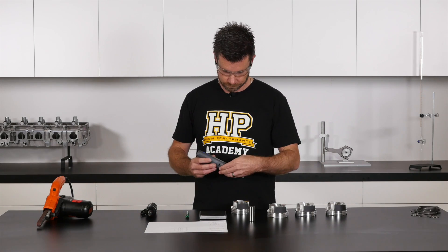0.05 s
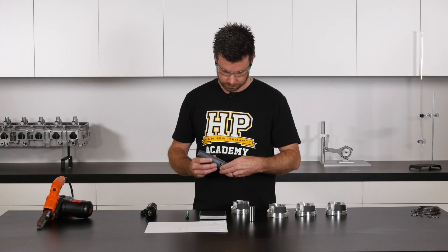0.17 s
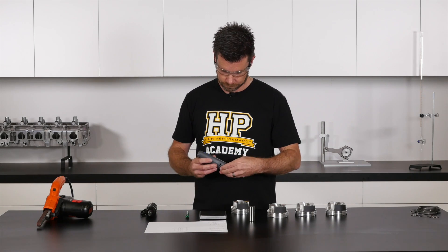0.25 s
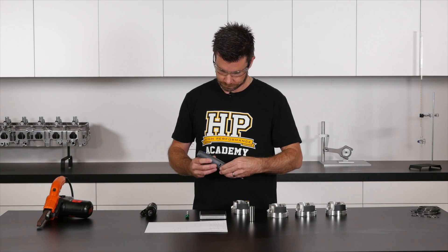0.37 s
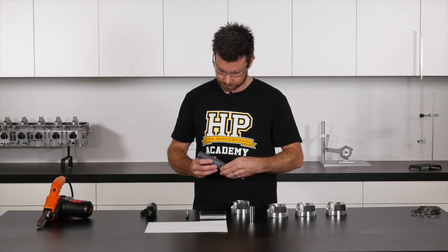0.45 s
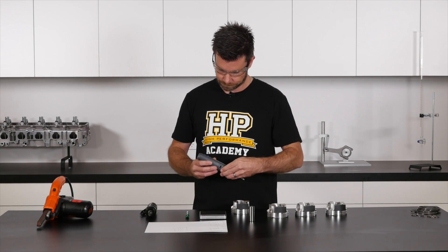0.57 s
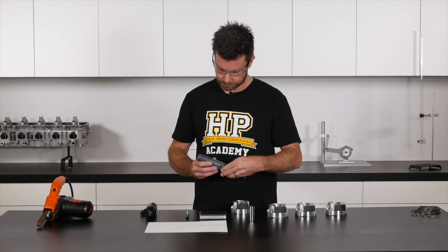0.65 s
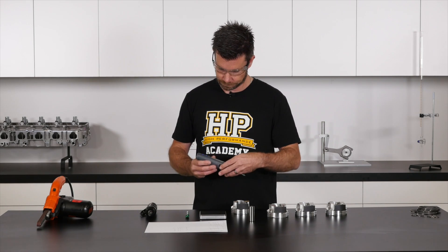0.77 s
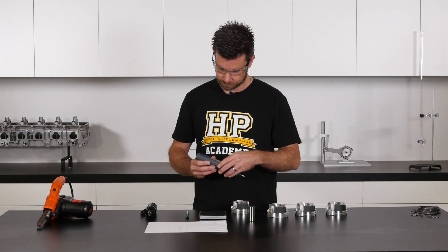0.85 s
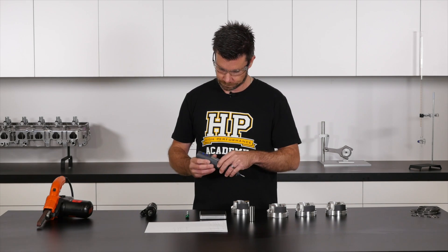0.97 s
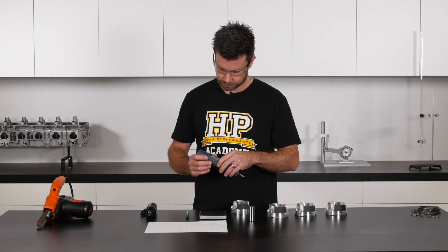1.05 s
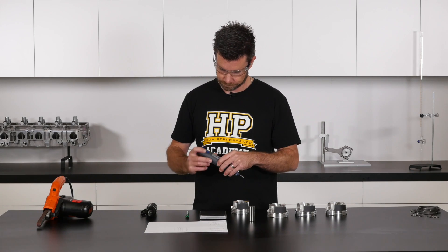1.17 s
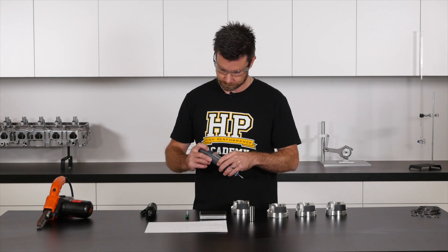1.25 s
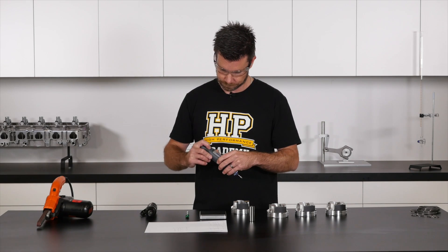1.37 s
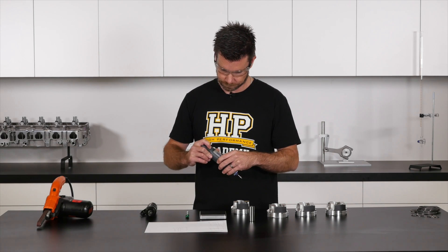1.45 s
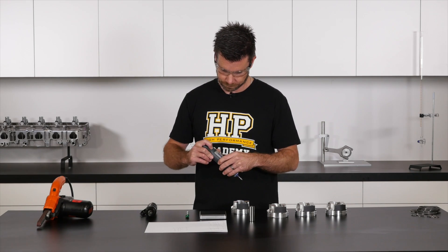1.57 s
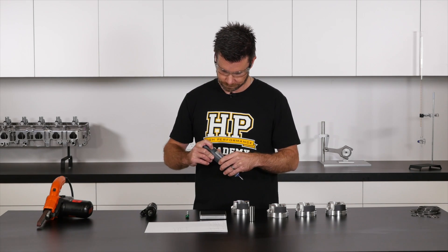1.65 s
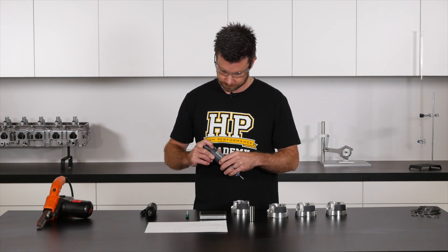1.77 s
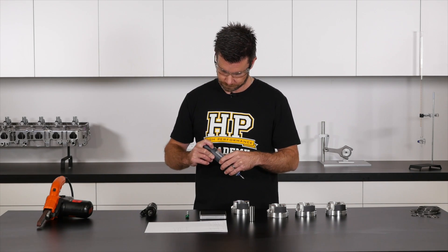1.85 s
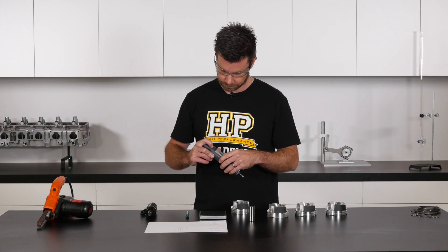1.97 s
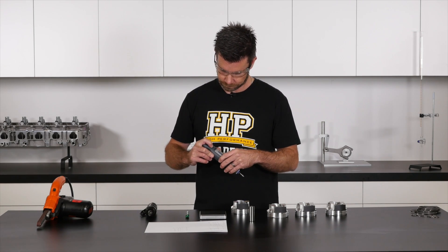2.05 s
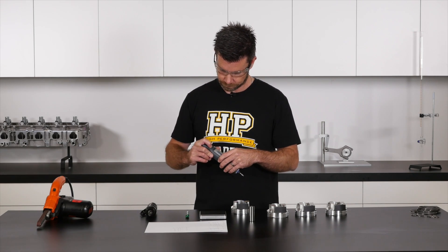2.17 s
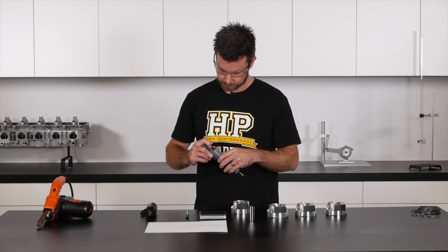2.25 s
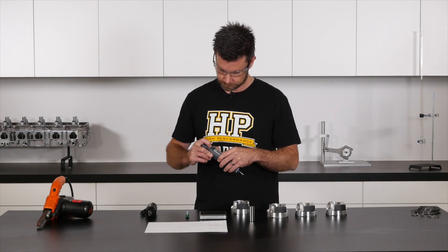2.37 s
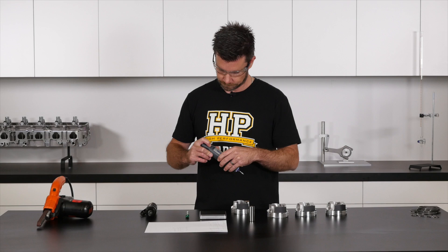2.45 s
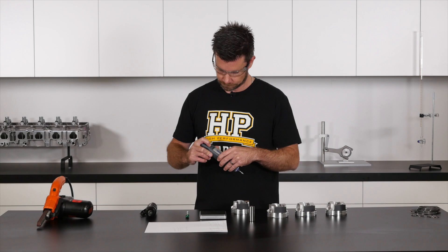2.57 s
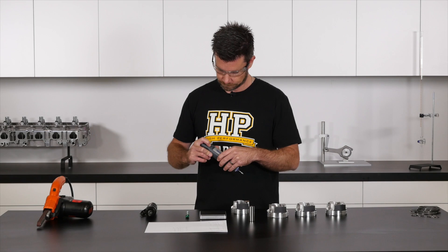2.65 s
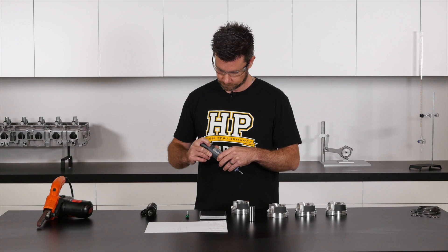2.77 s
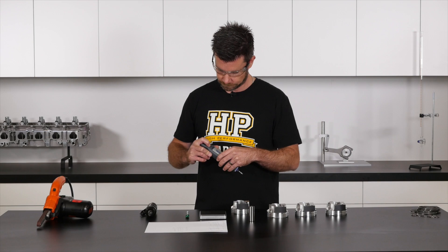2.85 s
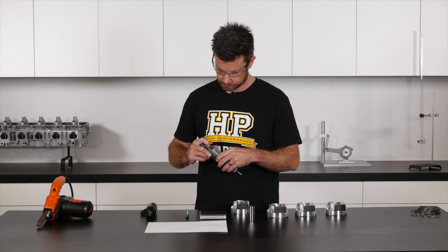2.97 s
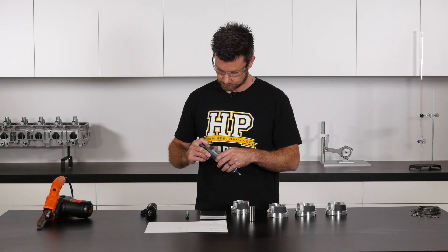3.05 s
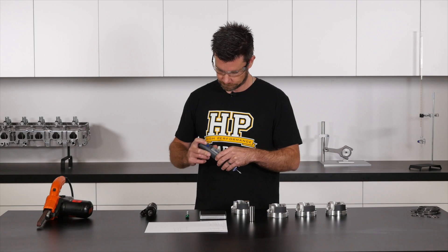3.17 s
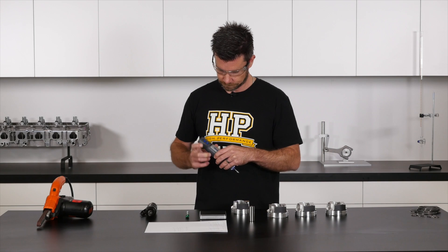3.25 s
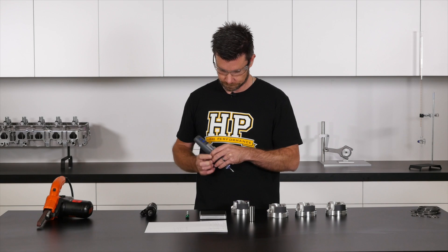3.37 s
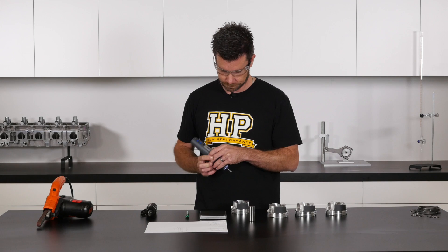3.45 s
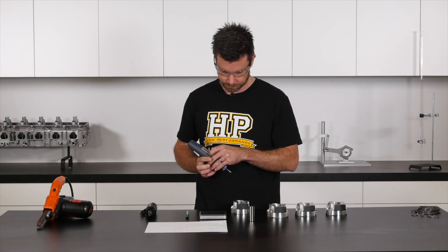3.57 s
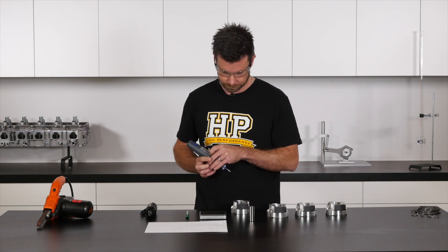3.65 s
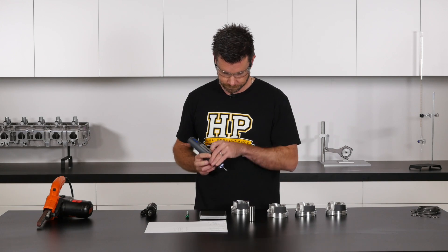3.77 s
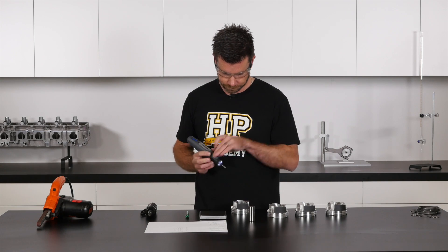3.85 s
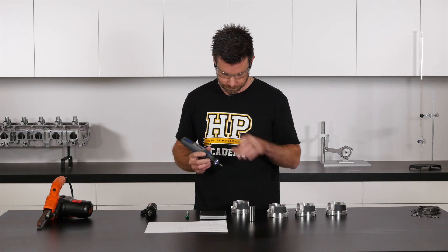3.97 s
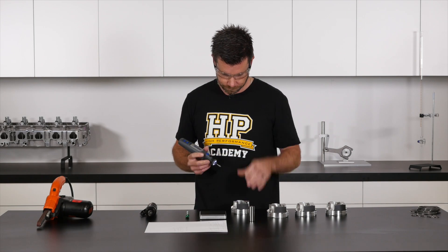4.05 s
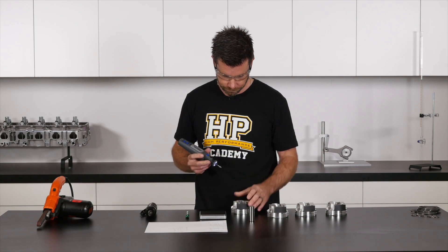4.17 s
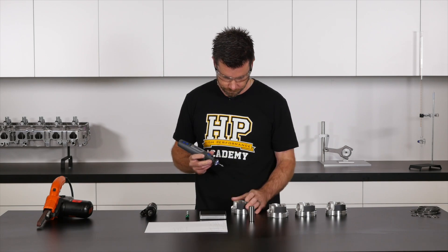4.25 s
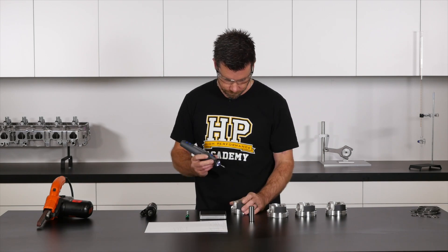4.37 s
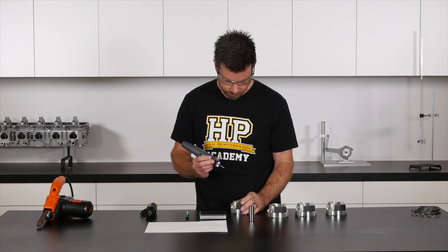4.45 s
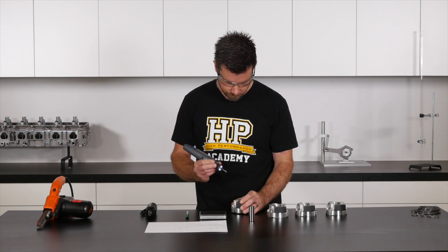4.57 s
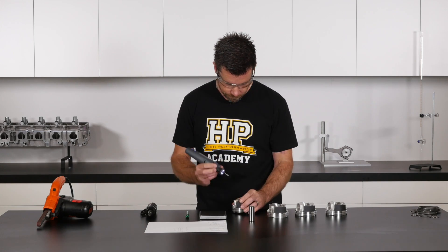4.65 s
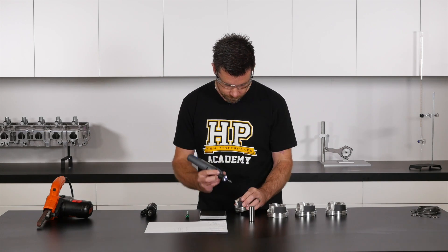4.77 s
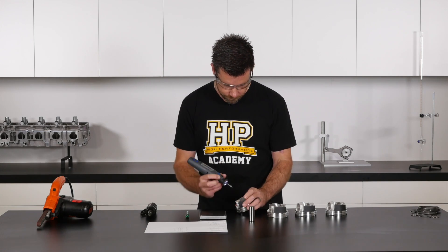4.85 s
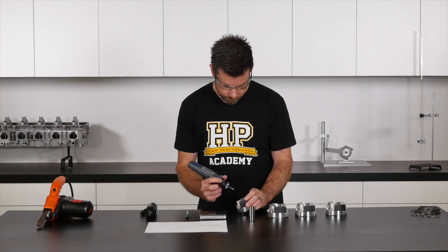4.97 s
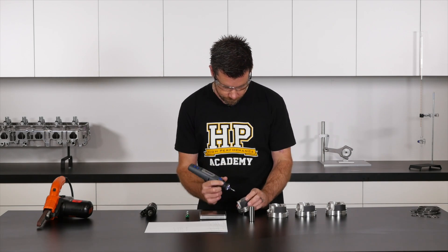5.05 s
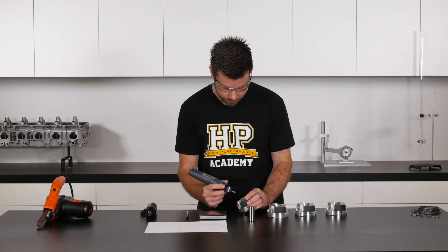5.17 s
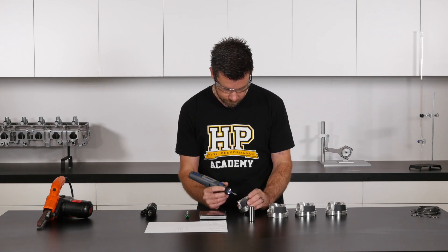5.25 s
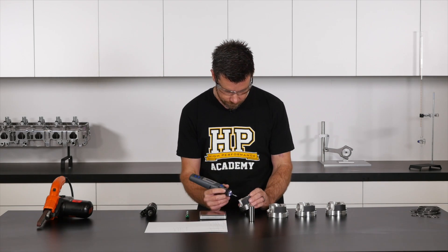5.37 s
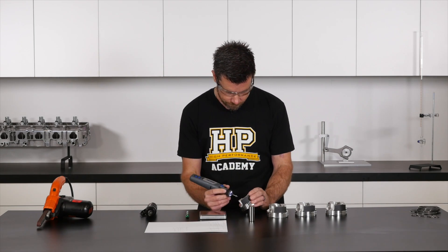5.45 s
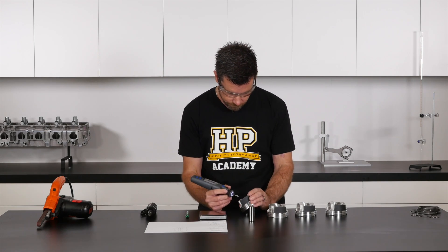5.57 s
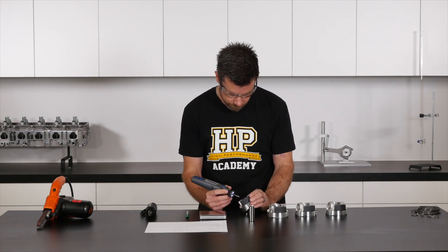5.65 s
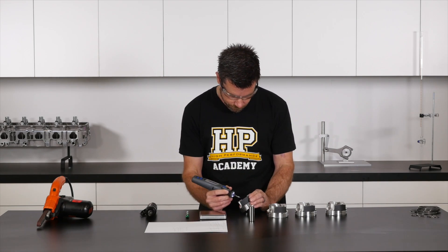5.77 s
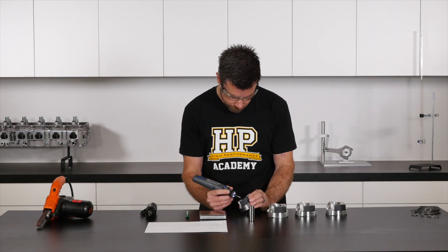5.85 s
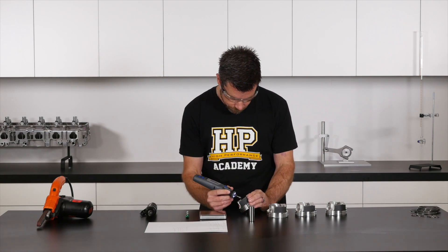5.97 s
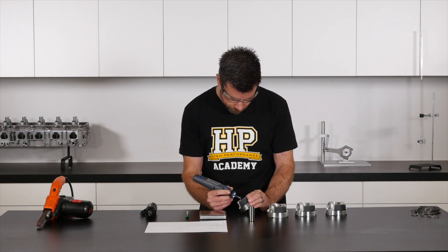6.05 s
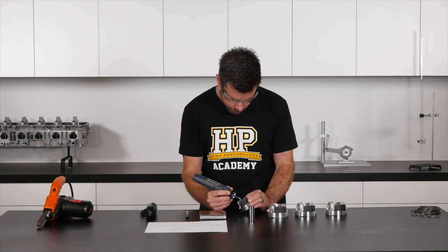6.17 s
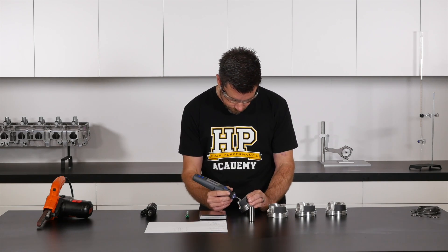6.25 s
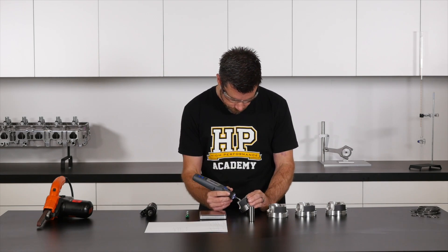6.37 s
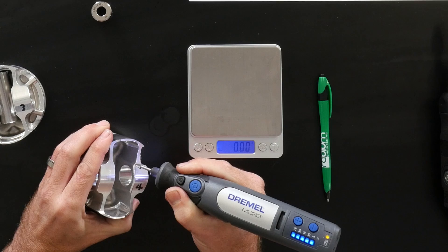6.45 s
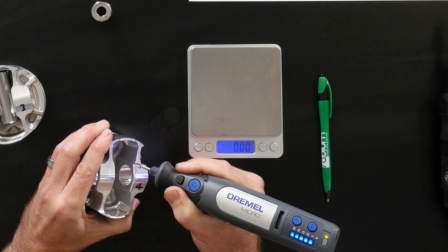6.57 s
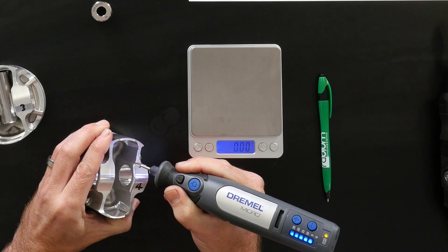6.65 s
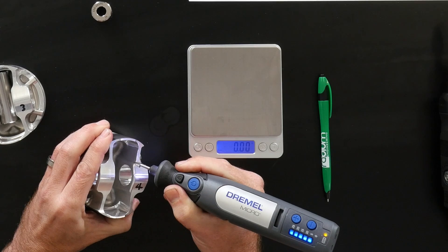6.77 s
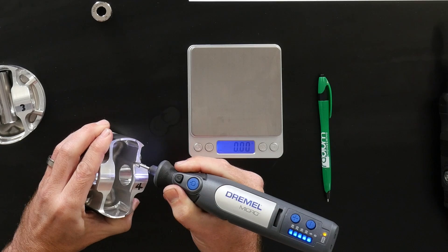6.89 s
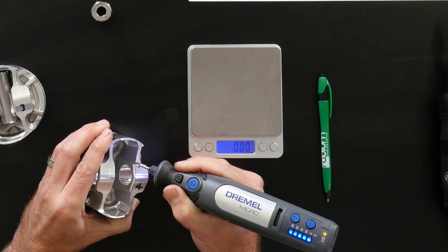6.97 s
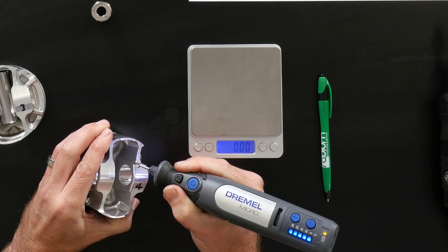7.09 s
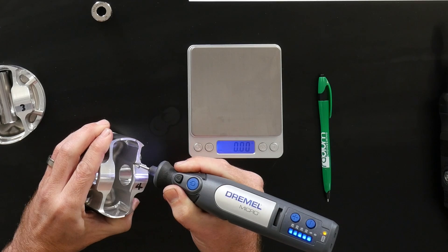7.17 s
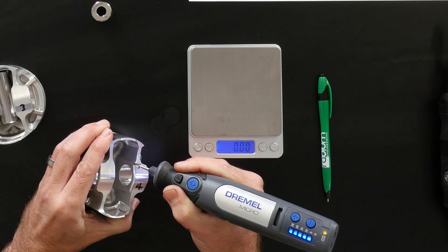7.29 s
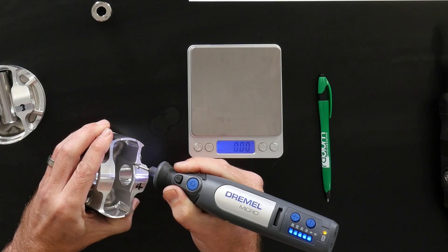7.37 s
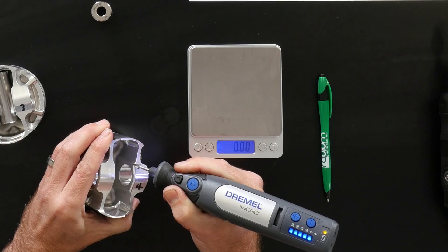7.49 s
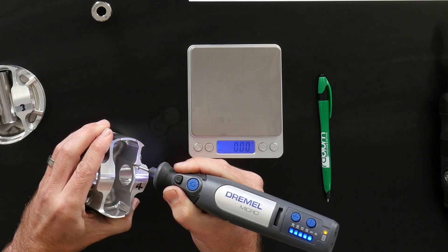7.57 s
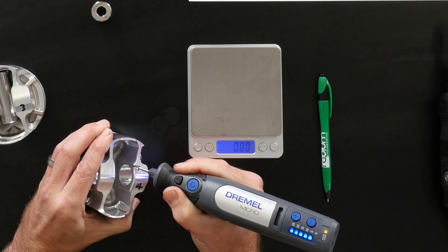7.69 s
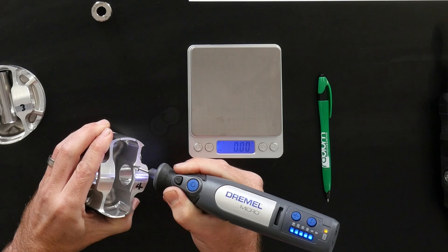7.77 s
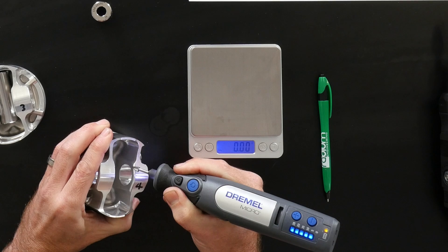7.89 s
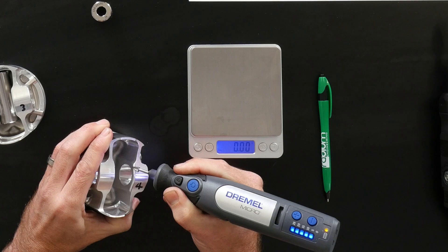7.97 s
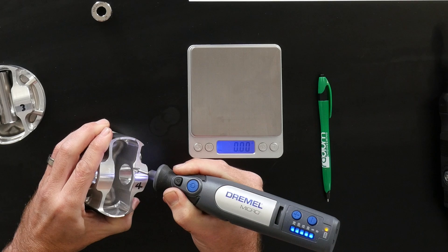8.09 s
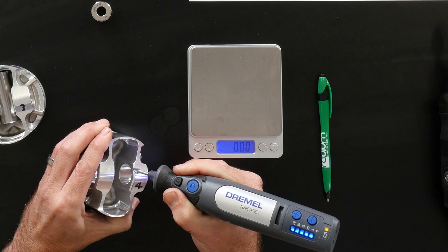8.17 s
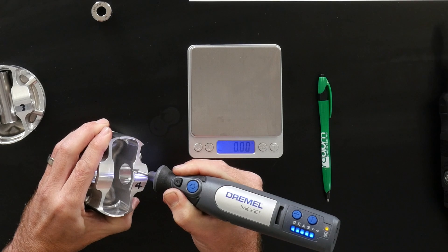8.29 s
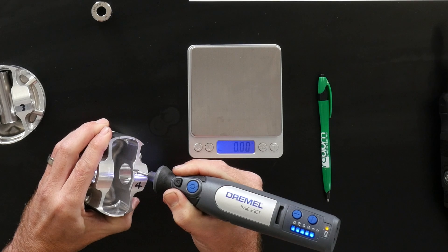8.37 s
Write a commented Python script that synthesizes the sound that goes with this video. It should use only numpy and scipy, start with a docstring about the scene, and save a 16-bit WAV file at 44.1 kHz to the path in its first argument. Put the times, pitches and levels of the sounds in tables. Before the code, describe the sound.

A small cordless rotary tool clicks on, its whine stepping up through three speeds, then the bit grinds metal with a rough chattering hiss.

```python
"""In a workshop, a small cordless rotary tool is switched on and stepped up through three speeds, close up and in mono.
Its whine is a stack of shaft orders, louder with speed and coloured by resonances; filtered noise is its fan's rush.
It is lowered to a metal piston, which knocks on the bench: short clicks ring the modes of the bench top.
Then the bit bites: the motor sags, grit noise swells once a turn and tones halfway between the orders chatter.
Ticks of plastic, the speed controller's thin switching tone and a faint room tone complete the scene."""
import sys
import numpy as np
from scipy import signal
from scipy.fft import rfft, irfft, next_fast_len
from scipy.io import wavfile

SR = 44100
rng = np.random.default_rng(int(sys.argv[2]) if len(sys.argv) > 2 else 0)


def generate_wav(sig):
    """Save sig (samples, or channels by samples) to the path in sys.argv[1] as 16-bit PCM at SR."""
    pcm = np.round(np.clip(np.atleast_2d(sig).T, -1, 1) * 32767).astype(np.int16)
    wavfile.write(sys.argv[1], SR, pcm)


N = 371322
TIME = np.arange(N) / SR   # s
STEPS = TIME[::100]        # s, the coarser clock of the slow controls
CUTOFF_HZ = 15720
LOW_SPLIT_HZ, HIGH_SPLIT_HZ = 3250, 9000   # borders of the low, middle and top register

# whine, buzz and sizzle, a row for each register, before grip and pull:
# (full-speed level [dB], loss per halving of speed [dB], level at full contact [dB])
TONES = [(-18.5, 11.5, -26), (-28, 5.5, -25), (-35, 7.5, -20.5)]
# noise of fan, brushes and grit, a row for each register, before grip and pull:
# (full-speed level [dB], loss per halving of speed [dB], level at full contact [dB])
NOISE = [(-29, 7.5, -31), (-39.5, 4.5, -32), (-41.5, 6.5, -25.5)]

# relative strengths of the low shaft orders; three commutator segments favour 3, 6 and 9:
# (multiple of shaft rate [-], level [dB])
START_ORDERS = [(1, -36), (3, -13), (4, -20), (6, -12), (7, -19), (8, -18), (9, -3), (10, -14), (12, -6),
                (14, -13), (15, 2), (16, -17), (18, -10), (19, -30), (50, -33)]
SLOW_ORDERS = [(1, -52), (2, -44), (3, -15), (4, -34), (5, -30), (6, 0), (7, -19), (8, -24), (9, -1),
               (10, -11), (11, -18), (12, -7), (13, -19), (14, -10), (15, -8), (16, -17), (18, -26)]
CLIMB_ORDERS = [(1, -25), (2, -13), (3, 2), (4, -5), (5, -10), (6, -1), (7, -9), (8, -8), (9, -7),
                (12, -15)]
SURGE_ORDERS = [(1, -15), (2, -12.5), (3, 3.5), (4, -8), (5, -1), (6, 5), (7, -9), (8, -15)]
RAISED_ORDERS = [(1, -12.5), (2, -9.5), (3, 6.5), (4, 1), (5, -0.5), (6, 5.5), (7, 1.5), (8, -3.5)]
LOWERED_ORDERS = [(1, -30), (2, -28.5), (3, -4.5), (4, -6.5), (5, -5.5), (6, -10), (7, -9), (8, -21)]
POISED_ORDERS = [(1, -15.5), (2, -3), (3, 3.5), (4, 1.5), (5, -6), (6, 3), (7, 1.5), (8, -6.5)]
TOUCHING_ORDERS = [(1, -13), (2, -3), (3, 3), (4, 3.5), (5, 4), (6, -1), (7, -3), (8, -6)]
CUTTING_ORDERS = [(1, -10), (2, 1), (3, 0.5), (4, -2), (5, 2), (6, -2), (7, -4.5), (8, -4.5)]
# treble resonances of housing and bit: (centre [Hz], width [Hz], height [dB])
SLOW_MODES = [(4870, 590, 15), (6070, 70, 20), (6530, 240, 24.5), (7640, 240, 22.5), (9200, 130, 17),
              (11000, 500, 7), (13260, 880, 11)]
RAISED_MODES = [(5740, 3300, 2.7), (10200, 363, 3.3), (11370, 240, 9.4)]
LOWERED_MODES = [(3970, 500, 27.8), (5350, 410, 24.7), (10260, 770, 12.5), (11350, 500, 8.94)]
APPROACH_MODES = [(3600, 2500, 9.9), (5050, 350, 15.4), (8500, 1100, 4.6), (10100, 640, 15.6),
                  (11960, 1600, 7.4)]
POISED_MODES = [(3430, 5400, 3), (5277, 195, 15), (6460, 500, 9), (11400, 500, 12.7), (13470, 250, 9)]
BITING_MODES = [(4750, 190, 14), (6100, 170, 5.9), (8400, 350, 12), (8880, 220, 11), (9900, 230, 6.9),
                (10800, 290, 16), (13550, 180, 11)]
CUTTING_MODES = [(3400, 89, 12.8), (4646, 123, 22.5), (6700, 390, 8), (8100, 710, 10.6), (9475, 120, 14),
                 (10700, 400, 23), (11750, 160, 21)]
# how the tool is running and held, blended in between:
# (start [s], end [s], bearing looseness [1 = usual], orders [table], resonances [table])
SITUATIONS = [(0, 1.15, 1.9, START_ORDERS, SLOW_MODES), (1.29, 2.839, 0.76, SLOW_ORDERS, SLOW_MODES),
              (3.09, 3.23, 1.338, CLIMB_ORDERS, SLOW_MODES),
              (3.274, 3.353, 1.9, SURGE_ORDERS, RAISED_MODES),
              (3.418, 3.99, 1.21, RAISED_ORDERS, RAISED_MODES),
              (4.502, 5.125, 1.07, LOWERED_ORDERS, LOWERED_MODES),
              (5.455, 5.92, 1.07, POISED_ORDERS, APPROACH_MODES),
              (6.05, 7.26, 0.44, POISED_ORDERS, POISED_MODES),
              (7.385, 7.46, 1.3, TOUCHING_ORDERS, POISED_MODES),
              (7.525, 7.73, 1, CUTTING_ORDERS, BITING_MODES),
              (7.797, 8.46, 0.76, CUTTING_ORDERS, CUTTING_MODES)]

# noise colours, relative: (frequency [Hz], density [dB per Hz])
BRUSHES = [(60, -33), (150, -22), (240, -18), (600, -7.5), (1050, 3.5), (1500, -7), (2500, -7.5),
           (3500, -22), (5100, -14.5), (6600, -12), (7600, -14), (8500, -15), (10200, -17), (12600, -10),
           (15500, -22)]
FAN = [(60, -62), (150, -39), (300, -24), (500, -14), (800, -10), (1080, 3.5), (1400, -4.5), (2100, -8),
       (2700, -21), (3400, -32.5), (6500, -29.5), (8500, -37), (12000, -39.5), (15700, -62)]
GRIT = [(40, -30), (90, -12.5), (170, -7), (600, -9), (1150, -8), (1500, -9), (2100, -1.5), (3500, -13.5),
        (4600, -9), (6500, -8), (8500, -7.5), (10900, 4), (13500, -7), (15700, 2)]
ROOM_TONE = [(15, -39), (25, -15), (59, -6), (69, -19), (82, -2), (101, -7.5), (113, -11), (126, -9.5),
             (227, -11.5), (260, -10), (349, -14), (1380, -22), (15500, -39)]
ROOM_TONE_DB = -62

# how firmly the bit touches the metal: (time [s], contact [share 0-1])
CONTACT = [(7.3, 0), (7.45, 0.05), (7.53, 0.38)]
# the bit bounces on every second turn: (time [s], level [dB])
CHATTER = [(7.68, -74), (7.76, -32), (7.86, -40), (7.94, -33), (8.03, -44), (8.1, -36), (8.2, -39),
           (8.3, -29.5), (8.42, -35.5)]
# tones of that chatter: (multiple of shaft rate [-], level [dB])
CHATTER_ORDERS = [(1.5, -11.5), (3.5, -9), (4.5, -7.5), (5.5, -3), (6.5, -4), (7.5, -9), (8.5, -14)]
# button and finger ticks on the plastic: (time [s], peak [dB], centre [Hz])
TICKS = [(.097, -44, 1500), (0.459, -45, 2000), (.541, -29.5, 2600), (.569, -52, 4500), (.586, -38, 3600),
         (.602, -50, 4000), (0.643, -44, 1100), (.688, -50, 1500), (.849, -40, 2500), (.874, -40, 2200)]
# the piston knocks on the bench: (time [s], level [dB])
KNOCKS = [(4.803, -39), (5.062, -27), (5.11, -28.5), (5.368, -35.5), (5.68, -10.5), (5.697, -17.5),
          (5.806, -16), (5.818, -13)]
# modes of the bench top: (frequency [Hz], level [dB], 60 dB decay [s])
BENCH = [(101, -42, 0.34), (149.7, -22, 0.43), (247, -18, 0.097), (318, -8.5, 0.056), (465, -7.5, 0.049),
         (555, 0, 0.036), (640, -9, 0.045), (790, -32, .05), (1050, -24, 0.034)]
# the speed controller's switching tone: (time [s], peak level [dB])
SWITCHING = [(.63, -100), (.645, -64), (.95, -62), (1.1, -45), (1.28, -42), (1.5, -47), (2.5, -47),
             (3.1, -68), (3.3, -100)]
SWITCHING_HZ = 10002

# the speed is stepped up: (start [s], setting [turns per s], ramp [s], rotor lag [s])
SPEED_STEPS = [(.645, 170, .49, .11), (2.486, 251.8, .283, .11), (2.964, 385, .334, .042)]
# friction and load hold the motor under its setting: (time [s], offset [turns per s])
SAG = [(1.5, -7.5), (1.9, -4.3), (2.5, -1.5), (3.4, -4.2), (4.62, -3.6), (4.86, -5.8), (5.35, -3.3),
       (5.88, -2.8), (6.36, -5), (6.6, -4), (7.36, -4.3), (7.68, -9.7), (7.84, -5.4)]
FULL_SPEED, IDLE_SPEED = 381, 161   # turns per s
TONE_IDLE_DB, NOISE_IDLE_DB = 3.5, 5.5   # further loss per halving of speed below IDLE_SPEED

# register levels as the hands shift the tool: (time [s], low [dB], middle [dB], top [dB])
GRIP = [(1.2, -3, -2.5, -2), (1.7, -1, -0.5, 0), (2.45, 0.5, -0.5, -0.5), (2.66, -1.5, 1.5, 1),
        (3.05, -4, -4.5, 0.5), (3.29, 5, -2, -4), (3.42, 1.5, 6, -5), (3.54, 0.5, 2.5, -5),
        (3.8, 1.5, 0.5, -3), (4.25, -1, -3, -2.5), (4.48, 1.5, 2.5, 1.5), (4.65, 0, 0.5, 0),
        (5.15, -1, 2, 1), (5.38, -1, -2.5, 3.5), (5.7, -2, -4, 4.5), (6.12, 0, 0, -0.5), (7.4, 0.5, .5, 2)]
# groups of three below are low, middle and top register
NOISE_FOLLOWS = (0.3, 0.66, 0.87)   # the noise's share of the swing of grip and throb
# a slow throb sets in while the bit hovers over the metal
THROB_FROM_S, THROB_PERIOD_S, THROB_DB = 5.94, 0.357, (0.5, 1.7, 0.7)
# the rush flares or dips briefly: (time [s], change [dB])
FLARES = [(2.79, 6), (3.22, 0.5), (3.28, 3), (4.42, 2.5), (5.04, -0.5), (5.96, -2)]
FLARE_RISE_S, FLARE_FALL_S, FLARE_SHARES = 0.041, 0.18, (0.62, 1, .8)
# the bit digs in harder: (time [s], rise [dB])
BITES = [(7.52, 6), (7.59, 4), (7.75, 0.5), (7.92, 5.5), (8.22, 3.5), (8.36, 2)]
BITE_RISE_S, BITE_FALL_S, BITE_SHARES = 0.027, 0.053, (1, 0.72, 0.85)
BITE_CHOKE = 0.47   # share of a bite's dB taken off the cutting level of the tones
# the motor draws more current as it speeds up: dB gained at a pull of 300 turns per s each s
TONE_PULL_DB, NOISE_PULL_DB = (-1, 1.5, 2.5), (2, 0.5, 1)
LOOSE_HISS_DB = (0.5, 5.5, 2)   # noise gained for one unit of looseness
SLOW_BEAT_HZ, SLOW_BEAT_DB = 10, 3.5   # at low speed the whine beats


def from_db(db):
    """Decibels to gain."""
    return 10 ** (np.asarray(db) / 20)


def rms_one(x):
    """Scale to rms 1."""
    return x / np.sqrt(np.mean(x ** 2) + 1e-20)


def read(rows, at):
    """Each column of a table, joined by straight lines and held beyond its ends."""
    first, *columns = np.transpose(rows)
    return [np.interp(at, first, column) for column in columns]


def smoothly(control):
    """A slow control at every sample."""
    return np.interp(TIME, STEPS, control)


def drift(rate_hz):
    """Slow random wander of rms 1."""
    pole = np.exp(-2 * np.pi * rate_hz * STEPS[1])
    chance = rng.standard_normal(2 * len(STEPS))
    wander = signal.lfilter([1], [1, -2 * pole, pole * pole], chance)
    return rms_one(wander[len(STEPS):])   # the first half only settles the filter


def swells(events, rise_s, fall_s):
    """Brief level changes, in dB: each comes quickly and dies away."""
    return sum(db * np.exp(np.minimum((STEPS - s) / rise_s, (s - STEPS) / fall_s)) for s, db in events)


def blend(values):
    """One value or column for each situation, crossfaded from one to the next."""
    times = [s for situation in SITUATIONS for s in situation[:2]]
    mix = 0
    for own, value in zip(np.eye(len(SITUATIONS)), values):
        mix = mix + np.interp(STEPS, times, np.repeat(own, 2)) * value
    return mix


def registers(hz):
    """Power shares of the low, middle and top register, with soft borders."""
    low = 1 / (1 + (hz / LOW_SPLIT_HZ) ** 20)
    top = 1 / (1 + (HIGH_SPLIT_HZ / hz) ** 20)
    return low, np.maximum(1 - low - top, 0), top


def coloured(spectrum):
    """Noise of a given spectrum, thinned in the deep bass and split into the three registers."""
    size = next_fast_len(N)
    hz = np.maximum(np.fft.rfftfreq(size, 1 / SR), 1)
    points, db = np.transpose(spectrum)
    colour = from_db(np.interp(np.log(hz), np.log(points), db)) * hz / (hz + 20)
    bins = rfft(rng.standard_normal(size)) * colour * (hz < CUTOFF_HZ)
    return [irfft(bins * np.sqrt(share), size)[:N] for share in registers(hz)]


def room_tone():
    """The quiet room is a steady bed of coloured noise."""
    return from_db(ROOM_TONE_DB) * rms_one(sum(coloured(ROOM_TONE)))


def ring(clicks, hz, t60):
    """Clicks set a decaying mode ringing; it radiates no deep bass."""
    radius, angle = from_db(-60 / (t60 * SR)), 2 * np.pi * hz / SR
    return signal.lfilter([.5, 0, -.5], [1, -2 * radius * np.cos(angle), radius * radius], clicks + 1e-18)


def knocks(room_db=-5, room_t60=0.63, contact_hz=1100):
    """Blows ring the modes of the bench top, and the workshop answers with a decaying noise tail."""
    at = [round(s * SR) for s, _ in KNOCKS]
    blows_db = np.array(KNOCKS)[:, 1]
    ringing = np.zeros(N)
    for hz, db, t60 in BENCH:
        clicks = np.zeros(N)
        # each blow excites each mode a little differently
        clicks[at] = from_db(blows_db + db + rng.normal(0, 3.0, len(at)))
        ringing += ring(clicks, hz, t60)
    # a blunt contact makes a dull thud
    thud = signal.sosfilt(signal.butter(3, contact_hz, fs=SR, output="sos"), ringing)
    age = TIME[:SR]
    tail = rng.standard_normal(SR) * from_db(-60 * age / room_t60) * (age > .008)
    return thud + from_db(room_db) * signal.fftconvolve(thud, tail / np.linalg.norm(tail))[:N]


def ticks(cycles=1.9, rustle_db=-11):
    """Short snaps of plastic: a band-passed click, each with a tiny rustling tail."""
    out = np.zeros(N)
    age = TIME[:SR // 20]
    for s, peak_db, hz in TICKS:
        band = signal.butter(1, [hz / 2, min(hz * 2, SR / 3)], "band", fs=SR, output="sos")
        rustle = rng.standard_normal(len(age)) * np.exp(-age * hz / cycles)
        snap = signal.sosfilt(band, (age == 0) + from_db(rustle_db) * rustle)
        start = int(s * SR)
        out[start:start + len(age)] += from_db(peak_db) * snap / np.abs(snap).max()
    return out


def switching():
    """The motor windings sing at the controller's switching rate."""
    return from_db(read(SWITCHING, TIME)[0]) * np.sin(2 * np.pi * SWITCHING_HZ * TIME)


def speed(at):
    """Turns per s: each step ramps the setting, the rotor lags behind it and load holds it back."""
    turning, before = read(SAG, at)[0], 0
    for start, setting, ramp, lag in SPEED_STEPS:
        since_start, since_end = np.maximum(at - start, 0), np.maximum(at - start - ramp, 0)
        # a first-order lag's answer to a slope that begins, less one that ends it
        begun = since_start + lag * np.expm1(-since_start / lag)
        ended = since_end + lag * np.expm1(-since_end / lag)
        turning = turning + (setting - before) * (begun - ended) / ramp
        before = setting
    return np.maximum(turning, 1)


def shaft(contact, looseness, wander=0.018, wander_rate=8, snag=0.00082, drag=0.0078):
    """Shaft angle in turns; bearing play grows with speed, and the bit snags and drags on the metal."""
    play = .0024 * drift(45) + wander * drift(wander_rate)
    bearings = looseness * speed(STEPS) / FULL_SPEED * play
    metal = contact * (snag * drift(60) + drag * drift(6.6))
    return np.cumsum(speed(TIME)) / SR + smoothly(bearings + metal)


def free_running(levels, pull_gains_db, idle_loss_db, follows=(1, 1, 1)):
    """Register levels in dB while the bit spins free: they move with speed, pull, grip and throb."""
    turning = speed(STEPS)
    halvings = np.log2(FULL_SPEED / turning)
    idling = np.maximum(np.log2(IDLE_SPEED / turning), 0)
    pull = np.gradient(turning, STEPS) / 300
    throbs = (STEPS - THROB_FROM_S) / THROB_PERIOD_S
    throb = -np.cos(2 * np.pi * throbs) * np.clip(2 * throbs, 0, 1)
    out = []
    for (full_db, loss_db, _), pull_db, share, grip_db, throb_db in zip(
            levels, pull_gains_db, follows, read(GRIP, STEPS), THROB_DB):
        speed_db = full_db - loss_db * halvings - idle_loss_db * idling
        out.append(speed_db + pull_db * pull + share * (grip_db + throb_db * throb))
    return out


def air_and_grit(turns, contact, looseness, fan_pulsing=0.28, grit_pulsing=0.31, flicker_db=1.5, grain_db=1.5):
    """Brush noise gives way to the fan as speed rises, and that to grit on contact; all swell once a turn."""
    once_a_turn = np.cos(2 * np.pi * turns)
    airflow = np.clip((speed(TIME) / FULL_SPEED) ** 3, 0, 1)
    flares = swells(FLARES, FLARE_RISE_S, FLARE_FALL_S)
    bites = swells(BITES, BITE_RISE_S, BITE_FALL_S)
    levels = free_running(NOISE, NOISE_PULL_DB, NOISE_IDLE_DB, NOISE_FOLLOWS)
    out = 0
    for brush, fan, free_db, loose_db, share in zip(
            coloured(BRUSHES), coloured(FAN), levels, LOOSE_HISS_DB, FLARE_SHARES):
        rush = np.sqrt(1 - airflow) * rms_one(brush) + np.sqrt(airflow) * rms_one(fan)
        db = free_db + loose_db * (looseness - 1) + share * flares + flicker_db * drift(48)
        level = smoothly(np.sqrt(1 - contact) * from_db(db))
        out = out + rms_one(rush * (1 + fan_pulsing * once_a_turn)) * level
    for grit, (_, _, cutting_db), share in zip(coloured(GRIT), NOISE, BITE_SHARES):
        db = cutting_db + share * bites + grain_db * drift(70)
        level = smoothly(np.sqrt(contact) * from_db(db))
        out = out + rms_one(grit * (1 + grit_pulsing * once_a_turn)) * level
    return out


def chatter(turns, waver_db=6.5):
    """The bit bounces on every second turn, which puts tones halfway between the shaft orders."""
    tones = 0
    for multiple, db in CHATTER_ORDERS:
        level = smoothly(from_db(db + waver_db * drift(28.3)))
        tones = tones + level * np.sin(2 * np.pi * (multiple * turns + rng.random()))
    return tones * from_db(read(CHATTER, TIME)[0]) * (TIME > CHATTER[0][0])


def resonance(hz, modes):
    """Gain of the treble resonances, their powers added to a flat floor."""
    return np.sqrt(1 + sum(from_db(db) ** 2 / (1 + (2 * (hz - f) / width) ** 2) for f, width, db in modes))


def order_powers(orders, hz, shares, slowness, contact, sway_db=1.0, treble_sway_db=2.5, sway_rate=4.1,
                 shimmer_db=0.95, taps_hz=14000, commutator_db=6):
    """Shaft orders sweep through the resonances and share their register's power; the hand sways each."""
    low = blend(from_db(read(strengths, orders)[0])[:, None] for *_, strengths, _ in SITUATIONS)
    treble = blend(resonance(hz, modes) for *_, modes in SITUATIONS)
    # at low speed the commutator's three segments stand out in the treble
    segment = orders[:, None] % 3 == 0
    treble = treble * from_db(commutator_db * segment * slowness)
    # its soft taps fade out at the very top
    treble = treble / (1 + slowness * (hz / taps_hz) ** 20)
    depth_db = sway_db * shares[0] + treble_sway_db * (1 - shares[0])
    sway = from_db(depth_db * np.array([drift(sway_rate) for _ in orders])) * (hz < CUTOFF_HZ)
    choke_db = BITE_CHOKE * swells(BITES, BITE_RISE_S, BITE_FALL_S)
    levels = free_running(TONES, TONE_PULL_DB, TONE_IDLE_DB)
    power = 0
    for shape, share, free_db, (_, _, cutting_db) in zip((low, treble, treble), shares, levels, TONES):
        db = (1 - contact) * free_db + contact * (cutting_db - choke_db) + shimmer_db * drift(15.0)
        part = share * (shape * sway) ** 2
        power = power + part / (part.sum(axis=0) + 1e-2) * from_db(db) ** 2
    # the buzz sets in after the whine
    return power * np.maximum(shares[0], np.clip((STEPS - 1.05) / 0.36, 0, 1))


def motor(turns, contact, looseness, count=92, flutter_db=2.0, treble_flutter_db=3.0, flutter_rate=11,
          rattle=0.24, scatter=2.27):
    """The whine is a sine for each multiple of the shaft rate; each flutters, and the high ones rattle."""
    orders = np.arange(1, count + 1)
    hz = orders[:, None] * speed(STEPS)
    shares = registers(hz)
    slowness = np.clip(2 * (1 - hz[0] / hz[0].max()), 0, 1)
    power = order_powers(orders, hz, shares, slowness, contact)
    out = np.zeros(N)
    for order, height, lowness in zip(orders, np.sqrt(2 * power), shares[0]):
        loose = looseness * (1 - lowness) * (1 - .6 * slowness)
        beat = np.sin(2 * np.pi * (SLOW_BEAT_HZ * STEPS + rng.random()))
        beat_db = SLOW_BEAT_DB * slowness * lowness * beat
        low_db = flutter_db * looseness * lowness * drift(flutter_rate)
        high_db = treble_flutter_db * loose * drift(22.0)
        flutter = rms_one(from_db(beat_db + low_db + high_db))
        phase = rng.normal(0, scatter) + rattle * loose * drift(15)   # radians
        out += smoothly(height * flutter) * np.sin(2 * np.pi * order * turns + smoothly(phase))
    return out * np.clip((TIME - .88) / 0.11, 0, 1)   # the tones fade in between 0.88 s and 0.99 s


def scene():
    """The quiet room, the handling and the tool, alike in both channels."""
    contact = np.clip(read(CONTACT, STEPS)[0], 0, 1)
    looseness = blend(situation[2] for situation in SITUATIONS)
    turns = shaft(contact, looseness)
    running = np.clip((TIME - .68) / 0.21, 0, 1)
    background = room_tone() + knocks() + ticks()
    spinning = air_and_grit(turns, contact, looseness) + motor(turns, contact, looseness)
    mono = background + switching() + chatter(turns) + running * spinning
    return np.array([mono, mono])


def record(dry):
    """The top is cut steeply."""
    return signal.sosfilt(signal.ellip(12, .2, 80, CUTOFF_HZ, fs=SR, output="sos"), dry)


dry = scene()
out = record(dry)
generate_wav(out)
```